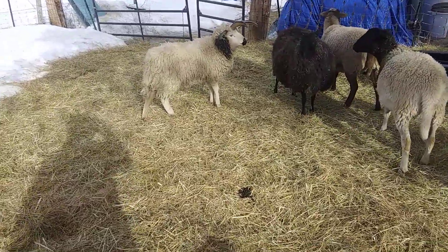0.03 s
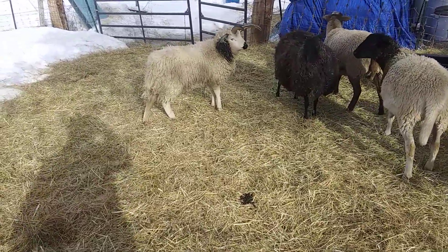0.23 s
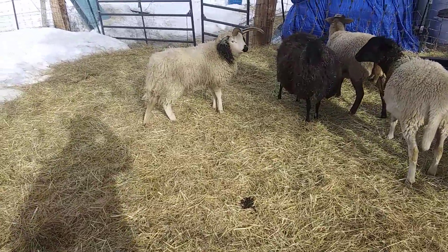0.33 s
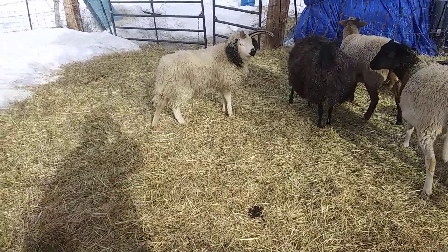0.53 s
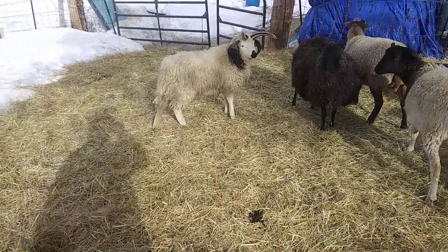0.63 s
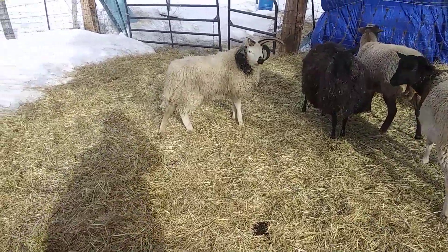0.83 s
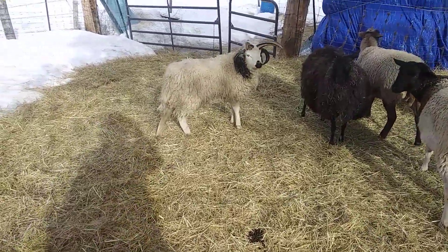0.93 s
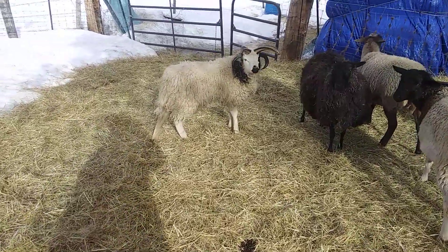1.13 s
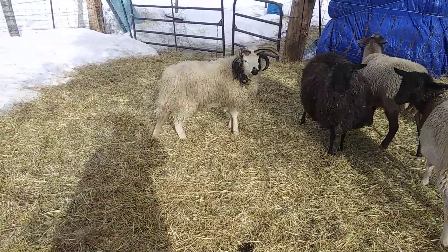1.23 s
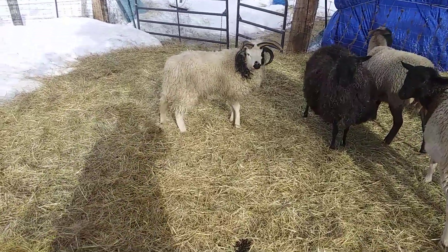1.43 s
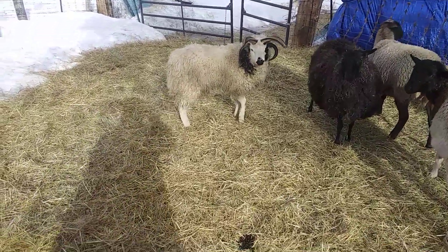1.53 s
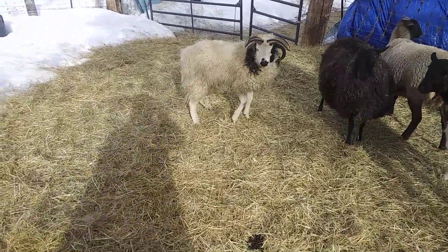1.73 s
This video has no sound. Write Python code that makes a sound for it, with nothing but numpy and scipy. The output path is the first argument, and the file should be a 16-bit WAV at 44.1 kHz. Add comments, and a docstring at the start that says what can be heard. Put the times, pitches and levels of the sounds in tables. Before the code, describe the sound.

A single hoarse sheep bleat starts on a brief clean rising tone, then throbs quickly and stops; dull hoof thuds and light straw rustling run beneath and continue after, close to the microphone in a quiet outdoor pen.

```python
"""In a straw-covered outdoor pen, a sheep gives a hoarse, wavering bleat.
The bleat opens on a clean rising tone, then throbs about twelve times a second. Each throb is a burst
of pulses trailed by a rasp, with a rough thin tone between; all three pass through a set of resonances.
Hooves thud as low sagging tones with a dull crunch. Straw rustles as shaped crackle and snaps as
short bursts of noise. Quiet outdoor air, made of shaped noise, lies under it all."""
import sys
import numpy as np
from scipy import signal
from scipy.fft import rfft, irfft
from scipy.io import wavfile
from scipy.ndimage import uniform_filter1d

SR = 44100
rng = np.random.default_rng(int(sys.argv[2]) if len(sys.argv) > 2 else 0)


def int16_out(signal):
    """Quantize to a 16-bit WAV file."""
    q = np.round(np.clip(np.atleast_2d(signal).T, -1, 1) * 32767)
    wavfile.write(sys.argv[1], SR, q.astype(np.int16))


N = 79380
NOW = np.arange(N) / SR  # the time of every sample, in seconds

# Still outdoor air. Each row: frequency in Hz, strength in dB per Hz (only the shape counts).
AIR_SPECTRUM = [(20, -14), (40, -6), (70, 8.5), (150, 6), (400, 6), (750, 5), (1100, -5), (2500, -15.5),
                (5000, -21.5), (8000, -20.5), (12500, -25), (15800, -23)]
AIR_DB = -59

# Shuffling in the straw. Each row: time in seconds, low scuff level in dB, high rustle level in dB.
SHUFFLE = [(0, -59, -76), (.03, -55.5, -76), (.09, -65.5, -99), (.135, -57, -73), (.19, -61.5, -61),
           (.35, -48.5, -80), (.62, -47.5, -73), (.85, -50.5, -80), (.95, -54, -64), (1.04, -60, -71),
           (1.13, -61, -62.5), (1.28, -61.5, -72), (1.37, -56.5, -65), (1.53, -59.5, -64.5),
           (1.61, -54.5, -64), (1.72, -56, -60), (1.8, -58.5, -70)]
# Colours of the straw sounds. Each row: frequency in Hz, strength in dB per Hz (only the shape counts).
SCUFF_SPECTRUM = [(100, -23), (250, 3.5), (450, -2.5), (750, -0.5), (1100, -1.5), (1600, -1.5),
                  (2400, -8.5), (3600, -11), (5000, -27), (15000, -32)]
RUSTLE_SPECTRUM = [(1000, -20), (3500, 1), (5000, -3.5), (7200, 1.5), (10000, -6), (13000, -8),
                   (15800, -0.5)]
CRUSH_SPECTRUM = [(300, -9), (800, -6), (1500, 3), (2500, -4.5), (3700, -6), (5000, -20), (15000, -30)]
# Steps that crush the straw. Each row: start in seconds, level in dB, time to the peak in seconds.
CRUSHES = [(1.544, -52.5, 0.022), (1.635, -52, 0.019)]
# Straw stalks snapping. Each row: start in seconds, peak level in dB.
SNAPS = [(.109, -59), (.253, -53), (0.3022, -41.5), (1.051, -54.5), (1.085, -54), (1.437, -56),
         (1.459, -48)]
SNAP_HZ, SNAP_WIDTH_HZ, SNAP_DECAY_S = 6870, 4500, 0.0024
CRACKLES_PER_S, CRACKLE_SPREAD_DB, CRACKLE_WASH = 1500, 3, 1  # wash: noise level next to the clicks

# Hoof thuds. Each row: start in seconds, level in dB, pitch at the peak in Hz, time to the peak in seconds.
THUDS = [(.002, -46.5, 137, .022), (.108, -42.5, 180.2, 0.018), (.125, -49.5, 96, 0.012),
         (0.219, -51, 80, 0.015), (0.654, -44, 74, 0.019), (0.749, -50.5, 70.5, .022),
         (0.924, -41.5, 79, .026), (0.956, -45, 130, 0.028), (1.038, -40.5, 102.7, 0.017),
         (1.115, -48, 83.4, 0.016), (1.175, -53.5, 103, 0.021), (1.297, -45.5, 109.3, 0.015),
         (1.605, -43.5, 101, 0.015), (1.654, -51, 104, 0.019)]
THUD_SAG_PER_S, THUD_CRUNCH, CRUNCH_HZ = 6.4, 0.49, 216  # pitch fall rate, crunch gain, its upper edge

# The nearly pure tone that opens the bleat. Each row: time in seconds, pitch in Hz, level in dB.
OPENING = [(.186, 505, -68), (.205, 540, -42), (.226, 574.3, -41), (.243, 591.4, -46), (.262, 594.2, -60),
           (.285, 598.3, -51), (.302, 611, -32.5), (.318, 630, -61), (.34, 645, -74)]
OPENING_JITTER = .015  # pitch unevenness, as a share of the pitch

# Throbs of the bleat. Each row: time of the peak in seconds, voice level in dB, rise in seconds,
# fall in seconds, pitch in Hz, rasp level in dB. Levels are those sent into the throat.
THROBS = [(0.2222, -40.5, 0.017, 0.011, 143.2, -43.5), (0.297, -39.5, 0.0068, 0.017, 153.3, -41),
          (0.3606, -35, 0.0054, 0.021, 146.7, -41.5), (0.45, -35, 0.0096, 0.0069, 146.9, -41.5),
          (.5195, -36, 0.013, 0.0085, 147.9, -40), (.5925, -35, 0.013, 0.011, 148.3, -40.5),
          (0.6788, -30, 0.011, 0.0069, 153.2, -40), (.754, -34, 0.0045, 0.016, 150.7, -42.5),
          (0.848, -34, 0.012, 0.011, 159.5, -43), (.934, -36, 0.01, 0.014, 144.8, -50)]
JITTER, SHIMMER_DB, PITCH_SAG = .03, 2.5, .03  # uneven pitch, uneven pulses, pitch drop at a throb's flanks
RASP_LAG_S, RASP_HALF_S = 0.011, 0.023  # how late the rasp peaks, and its spread
CHEST_DB, CHEST_LAG_S, CHEST_HALF_S = -13, 0.002, 0.0081  # clean tone: level against the voice, lag, spread
VOICE_NOISE, PUFF_CYCLES, PUFF_BASE = 0.21, 0.72, 0.88  # air noise; its decay in cycles, its steady part
PULSE_SMEAR, SMEAR_S, SMEAR_HZ = 0.71, 0.001, 1800  # hiss after each pulse: gain, decay, lower edge
HELD_HZ, HELD_JITTER, HELD_NOISE = 137.2, .12, 0.79  # the rough tone between throbs
HELD_NARROWING = 0.79  # the two lowest resonances are narrower under the soft held tone

# The mouth's course. Each row: time in seconds, held tone level into the throat in dB,
# first resonance in Hz, second resonance in Hz, brightness limit in Hz.
MOUTH = [(0.189, -59, 510, 1520, 1110), (0.208, -49.5, 535, 1580, 2040), (0.258, -51, 592, 1680, 3370),
         (.30, -44, 605, 1690, 3600), (.325, -53, 627, 1670, 3600), (.40, -43, 677, 1720, 4240),
         (.50, -43, 690, 1616, 5800), (.68, -42.5, 700, 1625, 5530), (.80, -43.5, 693, 1566, 4500),
         (.90, -49, 693, 1595, 4100), (.96, -47.5, 710, 1580, 4100), (1.02, -65, 690, 1550, 3000)]
# The two lowest throat resonances, which follow the mouth. Each row: width in Hz (before any narrowing),
# gain for the voice in dB, for the rasp in dB, for the held tone in dB. Gains count against each other.
LOW_THROAT = [(236, 4, -10, 0), (280, -2.5, 0, -10.5)]
# Throat resonances that stay put. Each row: frequency in Hz, width in Hz, gain for the voice in dB,
# for the rasp in dB, for the held tone in dB. Gains count against each other.
THROAT = [(160, 110, -11, -22, -20), (440, 80, -13, -24, -28), (1055, 100, -15, -20, -24),
          (2230, 280, -12, -6, -20), (2540, 200, -9, 1, -12), (2920, 380, -14, -5, -20),
          (3450, 600, -19, -11, -27), (4400, 900, -28, -25, -40), (6000, 1800, -36, -32, -55)]
LIPS_LEAK, LEAK_TOP_HZ = 0.19, 7000  # share of sound that passes at any opening, and where it dies away

# Echoes off the ground and the nearest gate. Each row: delay in seconds, gain as a plain factor.
ECHOES = [(.0017, 0.085), (.0135, 0.11)]
PEN_DB, PEN_T60_S, PEN_DELAY_S = -6, 0.11, .004  # reflections: level, time to fade by 60 dB, first arrival

LOW_CUT_HZ, EDGE_HZ = 36, 15850


def amp(db):
    """Turns decibels into gain."""
    return 10 ** (np.asarray(db) / 20)


def unit(x):
    """Scales a sound to an average (rms) level of 1."""
    return x / np.sqrt(np.mean(x ** 2) + 1e-20)


def curves(table):
    """Draws each column of a timed table as a smooth line with one value per sample."""
    seconds, *columns = np.transpose(table)
    return [np.interp(NOW, seconds, column) for column in columns]


def colour(x, points):
    """Gives a sound the wanted balance of low and high, at rms 1."""
    hz, db = np.transpose(points)
    bins = np.fft.rfftfreq(N, 1 / SR)
    shape_db = np.interp(np.log(bins + 1), np.log(hz), db)
    return unit(irfft(rfft(x) * amp(shape_db), N))


def add(mix, start_s, sound):
    """Mixes a sound in at its start time."""
    part = mix[max(round(start_s * SR), 0):][:len(sound)]
    part += sound[:len(part)]


def resonate(x, hz, width):
    """Rings steeply around one pitch, with gain 1 there; the pitch may follow a curve."""
    turn = np.exp(2j * np.pi * np.cumsum(hz * np.ones(len(x))) / SR)
    r = np.exp(-np.pi * width / SR)
    # shift the pitch down to zero, smooth, then shift it back up
    smooth = signal.lfilter([(1 - r) ** 2], [1, -2 * r, r * r], x / turn)
    return 2 * (turn * smooth).real


def air():
    """Still outdoor air is a steady noise, strongest in the lows."""
    return amp(AIR_DB) * colour(rng.standard_normal(N), AIR_SPECTRUM)


def crackle():
    """Many tiny stalk clicks of uneven size lie in a soft wash of noise."""
    sizes = amp(CRACKLE_SPREAD_DB * np.minimum(rng.exponential(1, N), 5)) * rng.choice([-1, 1], N)
    clicks = unit(sizes * (rng.random(N) < CRACKLES_PER_S / SR))
    return clicks + CRACKLE_WASH * rng.standard_normal(N)


def press(t, peak_s):
    """A hoof's load rises and falls softly, reaching 1 at its peak."""
    u = np.maximum(t, 0) / peak_s
    return (u * np.exp(1 - u)) ** 2


def straw():
    """Feet scuff, rustle and crush the straw; single stalks snap as short ringing bursts of noise."""
    scuff_db, rustle_db = curves(SHUFFLE)
    out = amp(scuff_db) * colour(crackle(), SCUFF_SPECTRUM)
    out += amp(rustle_db) * colour(crackle(), RUSTLE_SPECTRUM)
    crush = colour(crackle(), CRUSH_SPECTRUM)
    for start_s, db, peak_s in CRUSHES:
        out += amp(db) * press(NOW - start_s, peak_s) * crush
    t = np.arange(SR // 40) / SR
    for start_s, db in SNAPS:
        burst = rng.standard_normal(len(t)) * np.exp(-t / SNAP_DECAY_S)
        snap = resonate(burst, SNAP_HZ, SNAP_WIDTH_HZ)
        add(out, start_s, amp(db) * snap / abs(snap).max())
    return out


def thuds():
    """Each hoof gives the padded ground a low sagging push with a dull crunch."""
    out = np.zeros(N)
    t = np.arange(SR // 4) / SR
    band = signal.butter(3, [55, CRUNCH_HZ], "band", fs=SR, output="sos")
    for start_s, db, hz, peak_s in THUDS:
        sagging_hz = hz * np.exp(-THUD_SAG_PER_S * (t - peak_s))
        push = np.sin(2 * np.pi * np.cumsum(sagging_hz) / SR)
        crunch = unit(signal.sosfilt(band, rng.standard_normal(len(t))))
        thud = (push + THUD_CRUNCH * crunch) / np.hypot(1, THUD_CRUNCH)
        add(out, start_s, amp(db) * press(t, peak_s) * thud)
    return out


def cycles(hz, jitter):
    """Keeps a running count of vocal cycles at an unsteady pitch."""
    wobble = unit(uniform_filter1d(rng.standard_normal(len(hz)), size=250))
    return np.cumsum(hz * (1 + jitter * wobble)) / SR


def opening():
    """The bleat starts on a clean rising tone, while the mouth is still half shut."""
    hz, db = curves(OPENING)
    sounding = (NOW > OPENING[0][0]) * (NOW < OPENING[-1][0])
    tone = np.sqrt(2) * np.sin(2 * np.pi * cycles(hz, OPENING_JITTER))
    return amp(db) * sounding * tone


def puffs(turns):
    """Air noise surges once a cycle and dies down towards the next."""
    strength = PUFF_BASE + np.exp(-(turns % 1) / PUFF_CYCLES)
    return unit(strength * rng.standard_normal(len(turns)))


def folds(turns, noise):
    """The vocal folds give one uneven pulse a cycle, each with a short spit of hiss, in some air noise."""
    pulses = np.diff(np.floor(turns), prepend=np.floor(turns[0]))
    pulses = pulses * amp(SHIMMER_DB * rng.standard_normal(len(turns)))
    tails = signal.lfilter([1], [1, -np.exp(-1 / (SMEAR_S * SR))], pulses)
    spit = unit(tails * rng.standard_normal(len(turns)))
    spit = signal.lfilter(*signal.butter(2, SMEAR_HZ, "high", fs=SR), spit)
    mix = unit(pulses - pulses.mean()) + PULSE_SMEAR * spit + noise * puffs(turns)
    return mix / np.hypot(1, noise)


def throat(drive, index, narrowing=1):
    """The throat rings at its resonances; index picks gains for voice (0), rasp (1) or held tone (2)."""
    rows = [(hz, width * narrowing, dbs[index])
            for hz, (width, *dbs) in zip(curves(MOUTH)[1:3], LOW_THROAT)]
    rows += [(hz, width, dbs[index]) for hz, width, *dbs in THROAT]
    out, power = np.zeros(N), 0
    for k, (hz, width, db) in enumerate(rows):
        # every other resonance is turned upside down
        out += (-1) ** k * amp(db) * resonate(drive, hz, width)
        power += amp(db) ** 2 * width * np.pi / 2 / SR
    return out / np.sqrt(power)


def lips(x, bright_hz):
    """The lips dull the treble above a limit that follows the mouth, but let a share leak through."""
    hz, s, z = signal.stft(x, SR, nperseg=256)
    hz = hz[:, None]
    leak = LIPS_LEAK / np.hypot(1, (hz / LEAK_TOP_HZ) ** 4)
    through = (1 - LIPS_LEAK) / np.hypot(1, (hz / np.interp(s, NOW, bright_hz)) ** 5)
    return signal.istft(z * (leak + through), SR)[1][:N]


def bleat():
    """Throbs of pulses, their rasp and a held tone share one throat; a clean chest tone joins after it."""
    voice, rasp, chest = np.zeros((3, N))
    middle = SR // 10
    t = np.arange(-middle, middle) / SR
    for peak_s, db, rise, fall, hz, rasp_db in THROBS:
        start_s = peak_s + t[0]
        swell = np.exp(-.5 * (t / np.where(t < 0, rise, fall)) ** 2)
        turns = cycles(hz * (1 - PITCH_SAG * (1 - swell)), JITTER)
        turns = turns - turns[middle]  # a cycle begins right at the throb's peak
        add(voice, start_s, amp(db) * swell * folds(turns, VOICE_NOISE))
        rasp_swell = np.exp(-.5 * ((t - RASP_LAG_S) / RASP_HALF_S) ** 2)
        add(rasp, start_s, amp(rasp_db) * rasp_swell * puffs(turns))
        chest_swell = np.exp(-.5 * ((t - CHEST_LAG_S) / CHEST_HALF_S) ** 2)
        chest_tone = np.sqrt(2) * np.cos(2 * np.pi * turns)
        add(chest, start_s, amp(db + CHEST_DB) * chest_swell * chest_tone)
    held_db, _, _, bright_hz = curves(MOUTH)
    sounding = (NOW > MOUTH[0][0]) * (NOW < MOUTH[-1][0])
    held_turns = cycles(np.full(N, HELD_HZ), HELD_JITTER)
    held = amp(held_db) * sounding * folds(held_turns, HELD_NOISE)
    in_mouth = throat(voice, index=0) + throat(rasp, index=1)
    in_mouth += throat(held, index=2, narrowing=HELD_NARROWING)
    return lips(in_mouth, bright_hz) + chest


def pen(x):
    """Two near echoes join short scattered reflections from the gates and walls."""
    t = np.arange(SR // 2) / SR
    hits = rng.standard_normal(len(t)) * (rng.random(len(t)) < 2000 / SR)  # about 2000 a second
    taps = hits * amp(-60 * t / PEN_T60_S) * (t > PEN_DELAY_S)
    out = x + amp(PEN_DB) * signal.fftconvolve(x, taps / np.linalg.norm(taps))[:N]
    for delay, gain in ECHOES:
        add(out, delay, gain * x)
    return out


def scene():
    """Adds up the air, the straw, the steps and the sheep, whose voice alone echoes in the pen."""
    return (air() + straw() + thuds() + pen(opening() + bleat()))[None]


def record(dry):
    """Takes away the deepest lows and the highest treble."""
    cut = signal.sosfilt(signal.butter(6, LOW_CUT_HZ, "high", fs=SR, output="sos"), dry)
    low_pass = signal.firwin(511, EDGE_HZ, window=("kaiser", 9), fs=SR)
    return signal.oaconvolve(cut, low_pass[None], "same")


dry = scene()
out = record(dry)
int16_out(out)
```